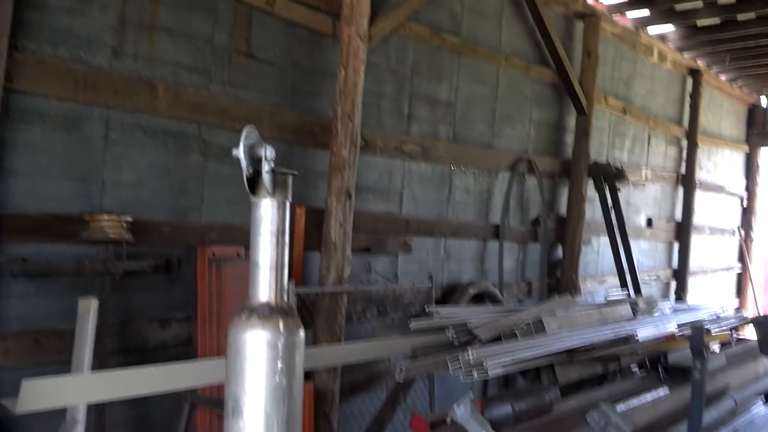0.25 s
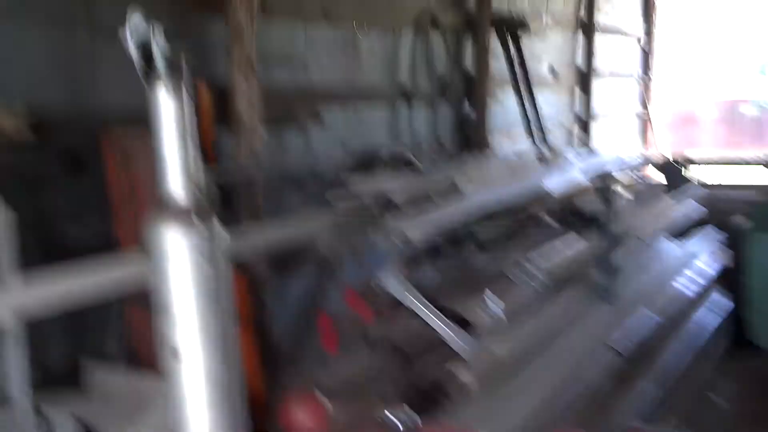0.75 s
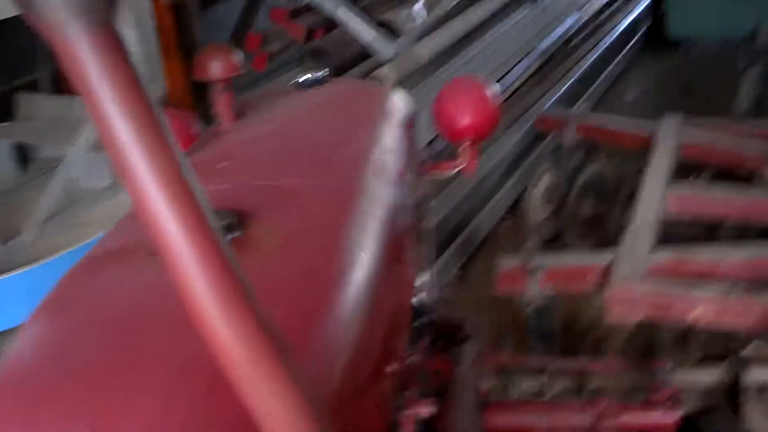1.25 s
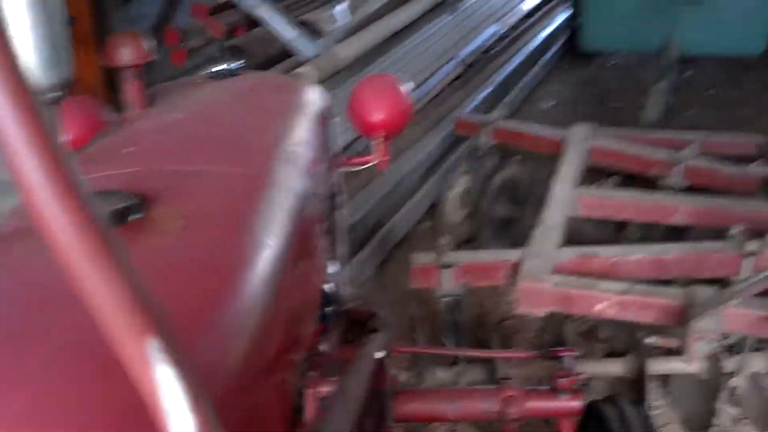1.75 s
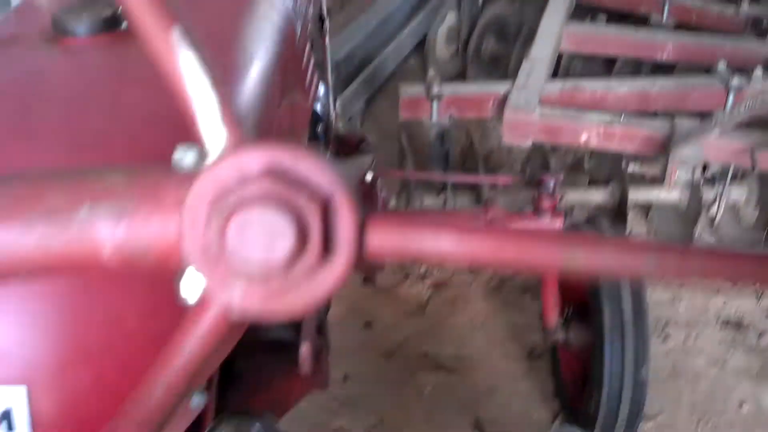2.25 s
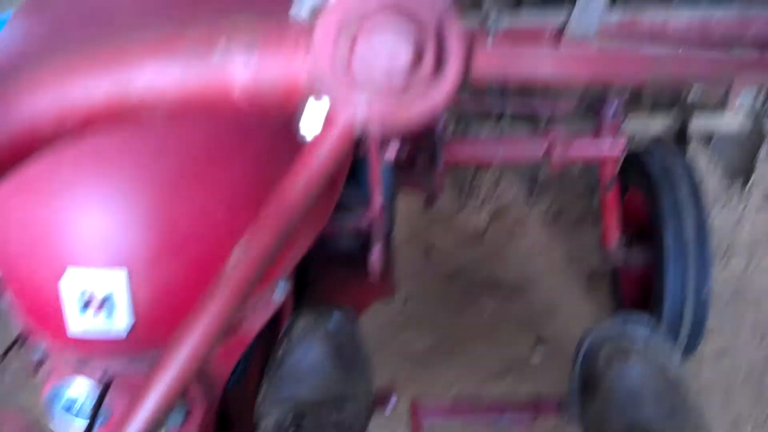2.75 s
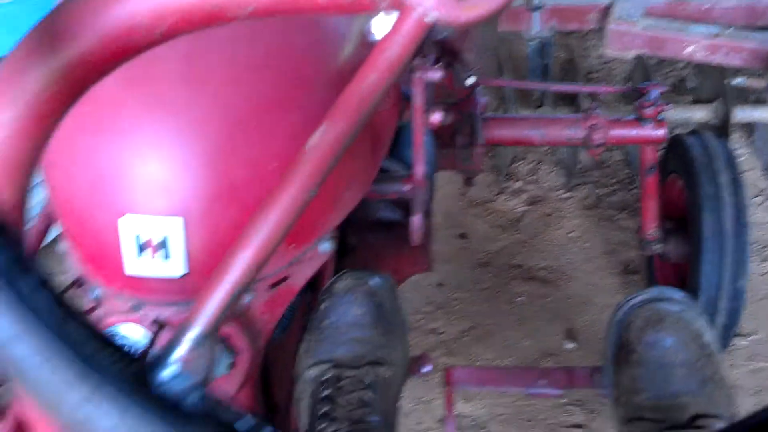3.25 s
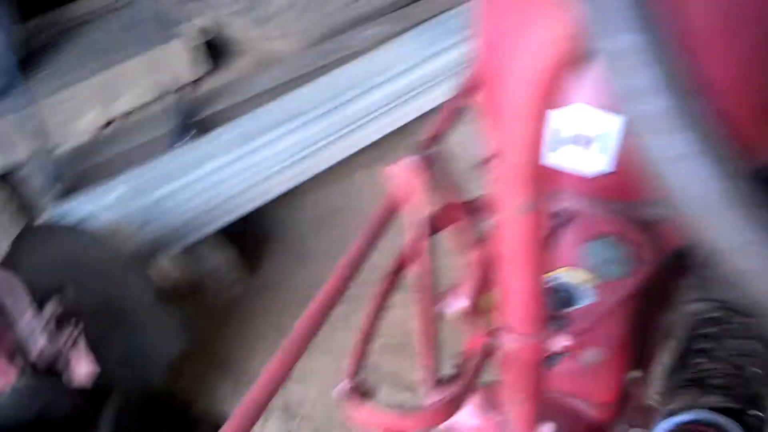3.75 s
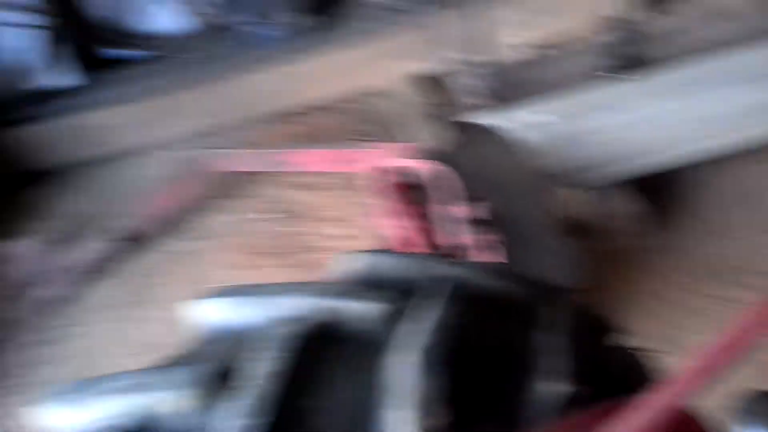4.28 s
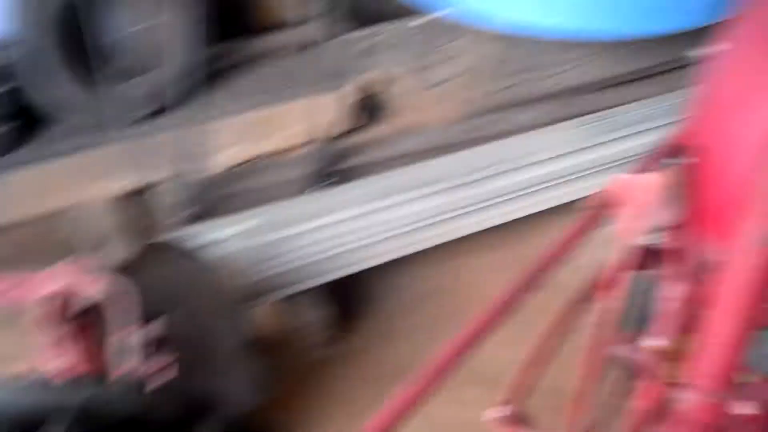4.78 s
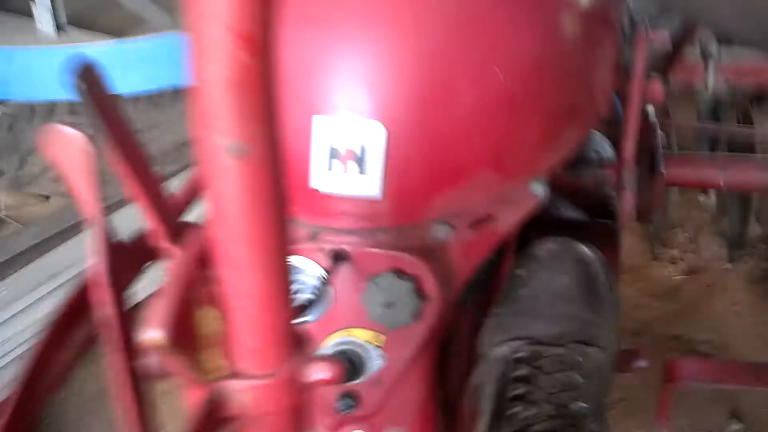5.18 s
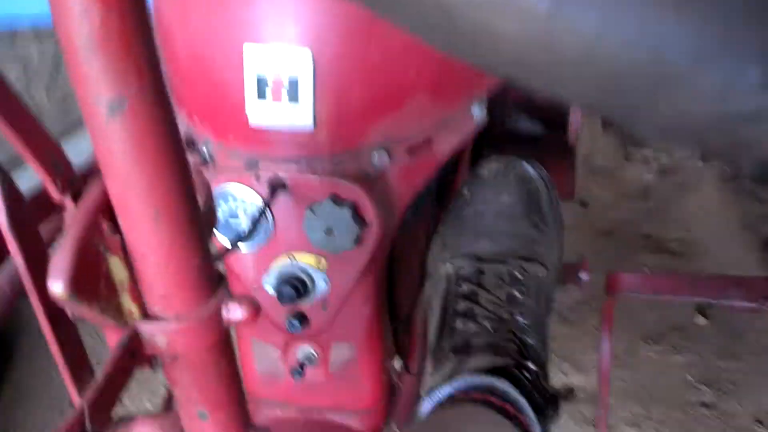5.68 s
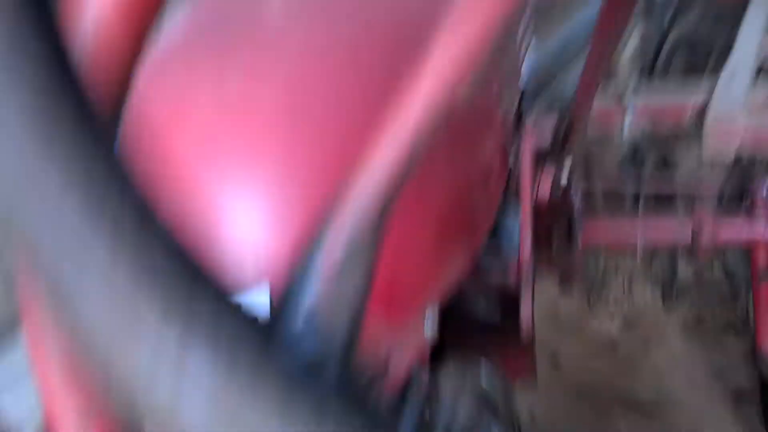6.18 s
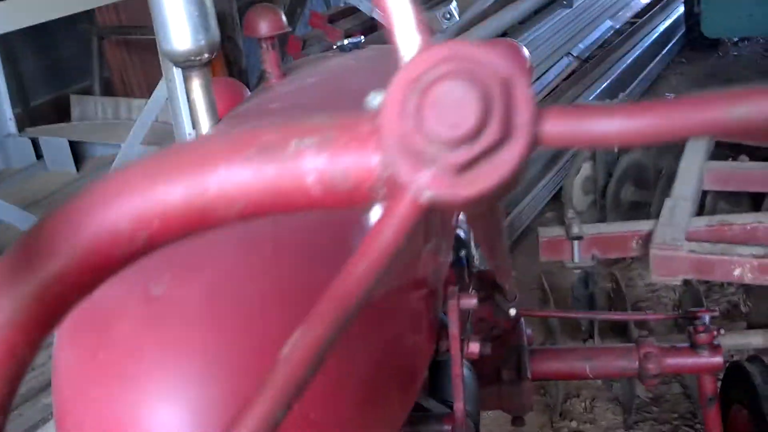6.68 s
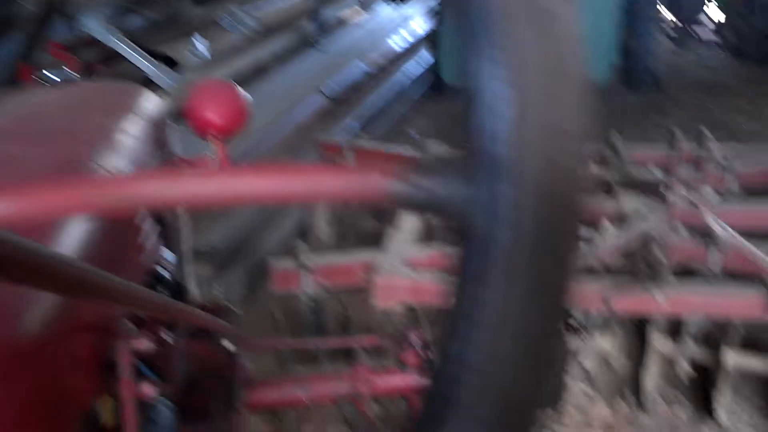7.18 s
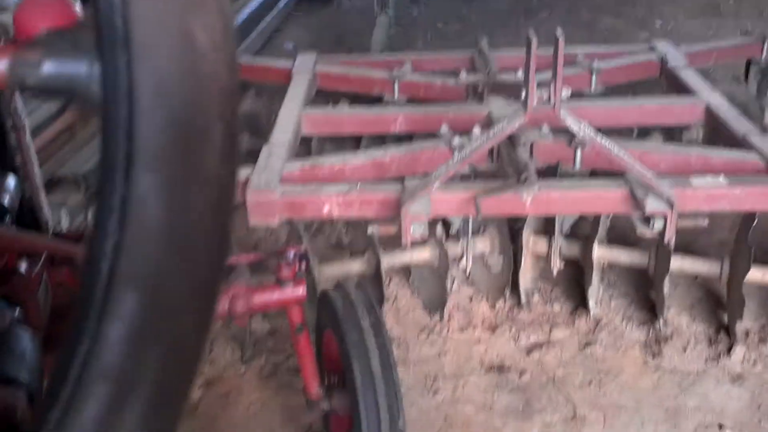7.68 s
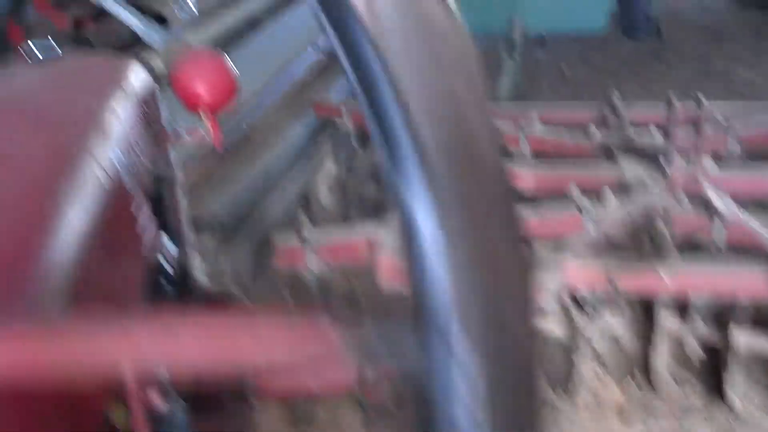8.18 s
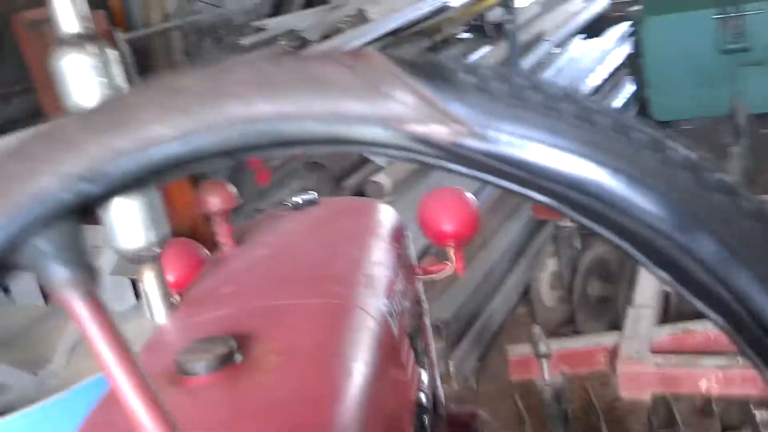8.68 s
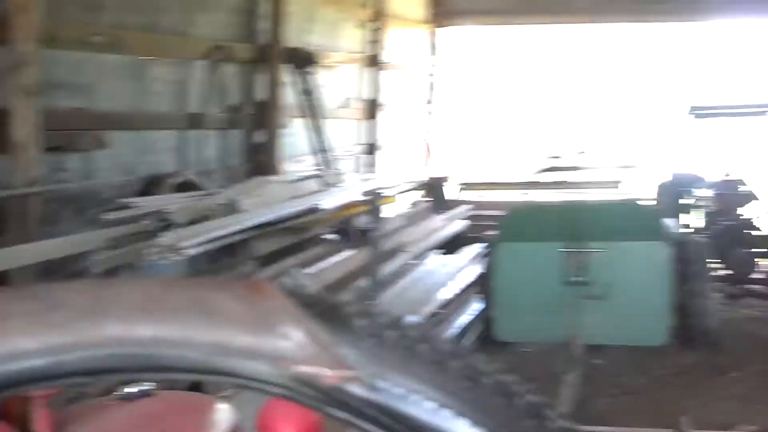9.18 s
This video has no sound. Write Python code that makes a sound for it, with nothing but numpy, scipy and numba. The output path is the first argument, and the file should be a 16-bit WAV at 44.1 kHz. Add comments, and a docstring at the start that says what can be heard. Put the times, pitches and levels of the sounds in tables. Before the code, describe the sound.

An old four-cylinder tractor engine idles steadily in a shed, clattering and throbbing, while fingers rub and knock the recording phone early on.

```python
"""In an open shed an old four-cylinder tractor idles, heard by a hand-held phone from the driver's seat.
Exhaust and engine tones tied to the crank throb; shaped noise, partly alike each cycle, makes clatter and roar.
A steady wavering tone is the fan's hum; decaying modes give the rain flap, a loose tappet and loose tin.
Fingers rub and knock the phone's case, which rings; loud knocks pull the gain control down and it creeps back."""
import sys
import numpy as np
from scipy import signal
from scipy.fft import rfft, irfft
from scipy.io import wavfile
from scipy.ndimage import uniform_filter1d
from numba import njit

SR = 44100
rng = np.random.default_rng(int(sys.argv[2]) if len(sys.argv) > 2 else 0)


def store_pcm(level_fs):
    """Save levels as 16-bit WAV."""
    pcm = np.round(np.clip(level_fs, -1, 1) * 32767).astype(np.int16)
    wavfile.write(sys.argv[1], SR, np.atleast_2d(pcm).T)


N = 416304
T = np.arange(N) / SR  # time of each sample, s
HZ = np.arange(N // 2 + 1) * SR / N + 1e-3  # frequency of each spectrum bin

# spectrum of engine clatter and gas roar, before it swells and fades: (frequency [Hz], level [dB per Hz])
ROAR_SPECTRUM = [(55, -90), (85, -66), (300, -62.5), (600, -61.5), (1100, -60), (1700, -69), (2600, -72),
                 (3200, -74), (3800, -75), (4300, -78.5), (5500, -80.5), (7500, -88), (10300, -94),
                 (11600, -85.5), (13500, -79), (15700, -80.5)]
# ringing modes of the phone case: (frequency [Hz], free fall by 60 dB [s], level [dB], left minus right [dB])
CASE_MODES = [(182, 0.089, -3.5, 5), (247, 0.32, -7, 2.5), (341.6, 0.34, -10.5, -0.5),
              (438.3, 0.18, -8.5, -18), (481, 0.17, -10, 3), (535, 0.039, -9, 10), (689, 0.12, -11, 9),
              (860, 0.2, -15, 1), (890, 0.13, -9.5, 4), (913, 0.25, -5.5, -1), (1040, 0.049, -6.5, -2.5),
              (1300, 0.057, -19, -1), (2060, 0.041, -21, -2), (3850, 0.0061, -47, -8)]
SIDE = np.array([[.5], [-.5]])  # shares a left-minus-right level between left and right


def undb(db):
    """Turn decibels into an amplitude factor."""
    return 10 ** (np.asarray(db, float) / 20)


def along(table, column=1):
    """Draw a table column along the frequency axis, straight on a log scale."""
    return np.interp(np.log(HZ), np.log([row[0] for row in table]), [row[column] for row in table])


def curves(table):
    """Draw the columns of a timed table as straight lines between its times."""
    seconds, *columns = np.transpose(table)
    return [np.interp(T, seconds, column) for column in columns]


def ring(x, hz, t60, part=np.imag):
    """Let x strike one mode, which falls by 60 dB in t60 seconds."""
    pole = np.exp(2j * np.pi * hz / SR - np.log(1000) / (t60 * SR))
    return part(signal.lfilter([1], [1, -pole], x))


def walk(rate):
    """Wander smoothly between random values, rate new ones a second, with a spread near 1."""
    k = int(SR / rate)
    steps = np.repeat(rng.standard_normal(N // k + 1), k)
    return 1.153 * uniform_filter1d(uniform_filter1d(steps, k), k)[:N]


def strikes(seconds, db):
    """Place single-sample blows at the given times."""
    x = np.zeros(N)
    x[(np.asarray(seconds) * SR).astype(int)] = undb(db)
    return x


def shed_echoes():
    """Echoes in the shed are imitated by steady low noise, different at each microphone."""
    low_pass = 1 / (1 + (HZ / 1100) ** 8)
    shape = undb(along(ROAR_SPECTRUM) - 7.0) * np.sqrt(SR / 2 * low_pass)
    return irfft(np.array([rfft(rng.standard_normal(N)) * shape for _ in range(2)]), N)


def finger_rubs():
    """A sliding finger sticks and slips; the many tiny clicks ring the case at both microphones."""
    # slides, pressing evenly harder or softer: (start [s], end [s], start level [dB], end level [dB])
    rubs = [(0, 0.48, -15.5, -18.5), (0.492, 0.58, -19, -22), (1.012, 1.05, -19.5, -34),
            (1.058, 1.097, -34, -22), (4.5, 4.785, -54, -21)]
    slips = (rng.random((2, N)) < 1500 / SR) * rng.standard_normal((2, N))  # 1500 clicks per second
    slips[1] = .9 * slips[0] + .4 * slips[1]  # the two sides hear much the same clicks
    press = sum((T >= a) * (T < b) * undb(np.interp(T, [a, b], [a_db, b_db])) for a, b, a_db, b_db in rubs)
    press = uniform_filter1d(press, int(.013 * SR))  # soft edges of 13 ms
    slips = slips / slips.std() * press * undb(1.2 * walk(30))
    # the lowest modes rock the phone, so its two ends move in opposite senses
    rock = np.array([[1], [-1]])
    out = 0
    for k, (hz, t60, db, pan_db) in enumerate(CASE_MODES):
        sign = (-1) ** k * rock ** (hz < 300)
        out = out + sign * undb(db + pan_db * SIDE) * ring(slips, hz, t60) / np.sqrt(t60 * SR / 10)
    return out


def finger_knocks():
    """A fingertip pushes briefly and lets go; the case modes near the blow's pitch ring, damped by the grip."""
    # knocks: (time [s], peak level [dB], centre of the modes struck [Hz],
    #          grip damping [ring time is divided by it], left minus right [dB])
    knocks = [(.292, -5.5, 780, 3.1, -1), (0.469, -2, 860, 9.8, -3.5), (0.507, -0.5, 670, 5.7, -0.5),
              (.5826, -8.5, 427, 2.2, -15), (0.845, -17, 1300, 4, -3), (0.857, -12, 497, 6.5, 6),
              (0.86, -11, 1100, 5.2, -2.5), (0.8852, -13, 423, 4.6, 8), (0.924, -19, 900, 8, -3),
              (1.0581, -5, 1700, 5.7, 3), (1.0586, -4, 1060, 10, -5), (1.0774, -4.5, 630, 26, 12),
              (1.0807, -25, 333, 6.9, -7), (1.092, -13, 950, 8, -5), (2.53, -18, 690, 1.7, 2),
              (4.7455, -14, 700, 8, -2), (4.7839, 10, 993, 66, -0.5)]
    # modes that lie close together share a blow
    share = np.minimum(np.gradient(np.log2([mode[0] for mode in CASE_MODES])), .2)
    out = np.zeros((2, N))
    for s, db, centre_hz, grip, pan_db in knocks:
        push = np.diff(np.hanning(int(SR / centre_hz / 1.2)) ** 2)
        start, tap = int(s * SR), np.pad(push, (0, 4000))
        # a loose grip lets a single mode sing out
        spread_oct = .45 * min(grip / 3, 1) ** 3
        knock = 0
        for part, (hz, t60, *_) in zip(share, CASE_MODES):
            near = np.exp(-.5 * (np.log2(hz / centre_hz) / spread_oct) ** 2)
            knock = knock + part * near * ring(tap, hz, min(t60, .11) / grip)
        out[:, start:start + len(tap)] += undb(db + pan_db * SIDE) * knock / abs(knock).max()
    return out


def tin():
    """A loose sheet shakes in short bright bursts of ringing grains and now and then squeaks on one tone."""
    # ringing modes of the sheet: (frequency [Hz], fall by 60 dB [s])
    modes = [(3560, .03), (3700, 0.045), (3830, .03), (3990, .03)]
    # bursts of shaking: (start [s], level [dB])
    shakes = [(.87, -49), (1.47, -50), (1.61, -48), (1.8, -45), (2.04, -43), (2.23, -45), (2.48, -44),
              (2.92, -48), (3.07, -48), (3.789, -48), (4.09, -44), (4.38, -44), (4.53, -46), (5.25, -42),
              (6.11, -47), (6.26, -46), (7.1, -44), (7.68, -42), (7.84, -45), (8.42, -47), (8.71, -49),
              (8.86, -47)]
    # squeaks: (start [s], length [s], level [dB])
    squeaks = [(2.927, .13, -45), (3.68, 0.13, -49), (6.421, .16, -48)]
    swell = signal.oaconvolve(strikes(*np.transpose(shakes)), np.hanning(int(.068 * SR)))[:N]  # 68 ms each
    grains = (rng.random(N) < 900 / SR) * rng.standard_normal(N)  # 900 per second
    shaken = sum(ring(grains, hz, t60) for hz, t60 in modes)
    loudness = sum(undb(db) * (T > a) * (T < a + length) for a, length, db in squeaks)
    loudness = uniform_filter1d(loudness, size=600) * undb(2.5 * walk(60))
    squeak = loudness * np.cos(2 * np.pi * 3860 * T + .8 * walk(80))
    return swell * shaken / shaken.std() + squeak


def flap(turns, rise_s=.0018, hold_s=.036):
    """The rain flap chatters on the stack: each mode swells, holds and fades, wavering, with weak bounces too."""
    # ringing modes of the flap: (frequency [Hz], twice the fade by 60 dB [s], level [dB])
    modes = [(3690, .15, -5), (4520, .24, -3), (5770, .16, -9), (6700, .22, -5), (7730, .18, -12)]
    # clinks: (time [s], level [dB], extra level of the upper modes [dB])
    clinks = [(0.0094, -36, -10), (0.4204, -34, -22), (0.6729, -35.5, -11), (1.03, -48, -12),
              (1.075, -37, -5), (1.83, -41, -15), (1.9545, -49, -3), (2.03, -37, 4), (2.4573, -41, -7),
              (2.6469, -43, 5), (2.69, -49, -3), (3.241, -48, -5), (3.42, -40, -15), (3.46, -44, -15),
              (3.621, -46, -12), (3.81, -51, -10), (3.965, -55, -14), (4.14, -47, -12), (4.729, -52, 8),
              (4.87, -47, -15), (4.91, -51, -15), (5.2694, -43, -15), (5.887, -38, -6), (6.4782, -39, -6),
              (6.53, -49, -10.5), (7.015, -50, -12), (7.08, -36, -8), (7.115, -41, -17), (7.28, -38, -18),
              (7.34, -40, -17), (7.46, -46, -14), (7.595, -44, -17), (8.41, -48, -13), (8.73, -50, -12),
              (9.06, -42, -10), (9.11, -48, -12), (9.3995, -41, -3)]
    s, db, upper_db = np.transpose(clinks)
    rise = np.convolve(np.hanning(int(2 * rise_s * SR)), np.ones(int(hold_s * SR)))
    # 110 bounces per second and mode on average, thickest about a third of the way through each cycle
    often = 110 / SR * (1 + .9 * np.cos(np.pi * turns - 1.9))
    out = 0
    for k, (hz, double_fade_s, mode_db) in enumerate(modes):
        upper, fade_s = k > 2, double_fade_s / 2
        weak = (rng.random(N) < often) * undb(-58.5 - 6 * upper + 2 * rng.standard_normal(N))
        blow = strikes(s, db + upper_db * upper + 1.2 * rng.standard_normal(len(s)))
        hits = signal.oaconvolve(blow, 2 * rise / rise.sum())[300:N + 300]
        bounces = uniform_filter1d(ring(weak, 0, fade_s, part=np.real), size=200)
        swell = ring(hits, 0, fade_s, part=np.real) + bounces
        tone = np.cos(2 * np.pi * hz * T + 1.3 * walk(110) + 6 * walk(8))
        out = out + undb(mode_db + 2.5 * walk(70)) * swell * tone
    return out


def tappet(turns):
    """One loose tappet ticks once a cycle and rings the rocker cover on a single dying tone."""
    # loudness of the tick: (time [s], level [dB])
    loudness = [(0, -33), (4.75, -31), (5.1, -19.5), (5.7, -18), (6.2, -18.5), (6.35, -24), (6.6, -21),
                (7.2, -21), (7.8, -30), (9.44, -31)]
    # the tick falls at 200 degrees of each 720 degree cycle
    ticks = np.diff(np.floor(turns / 2 - 200 / 720), prepend=-1) > 0
    ticks = ticks * undb(curves(loudness)[0] + .8 * rng.standard_normal(N))
    push = signal.lfilter(np.hanning(300) / 150, [1], ticks)
    swell = abs(ring(push, 1e-3, t60=.07, part=np.real))
    return swell * np.cos(2 * np.pi * 1065 * T + .5 * walk(60))


def fan_hum(turns):
    """The belt-driven fan hums at a fixed multiple of the crank's speed, wavering a little."""
    # the hum as the phone turns, before the engine's own swells: (time [s], level [dB])
    loudness = [(0, -50), (1.1, -48), (1.6, -44), (4.5, -42.5), (5.2, -43.5), (6.8, -43.5), (7.6, -42),
                (9.44, -42.5)]
    hum = np.cos(2 * np.pi * 21.6 * turns + .3 * walk(3))  # 21.6 waves per crank turn
    return np.sqrt(2) * undb(curves(loudness)[0] + 1.3 * walk(8)) * hum


def blows(cycle, table, blow_deg, between_db, scatter_db):
    """Loudness over the cycle: each blow starts sharply and dies away, a little different every time."""
    size = undb(scatter_db * rng.standard_normal((80, len(table))))
    out = undb(between_db)
    for k, (deg, db) in enumerate(table):
        since = cycle - deg / 720
        fade = np.exp(-(since % 1) * 720 / blow_deg)
        out = out + undb(db) * size[since.astype(int), k] * fade
    out = uniform_filter1d(out, size=160)
    return out / np.sqrt(np.mean(out ** 2))


def roar(turns, keep=.94, size=6400):
    """Clatter that recurs each cycle and slowly wears into new patterns, over fresh gas noise; both beat."""
    # In the next three, angles lie in the 720 degree cycle and levels are relative.
    # the four firings thump in the lower range: (crank angle [deg], level [dB])
    thumps = [(30, -15), (215, 5), (392, -2), (565, 5)]
    # blows heard in the middle range: (crank angle [deg], level [dB])
    knocking = [(55, 2), (150, -6.5), (205, -6.5), (250, -3.5), (325, -8.5), (385, -2), (450, -8.5),
                (545, -8.5), (595, -5), (685, -1)]
    # loose tin rattles in the treble: (crank angle [deg], level [dB])
    rattles = [(28, 0), (115, 0.5), (205, 0.5), (395, -7), (570, 1)]
    # share of the power that recurs from cycle to cycle: (frequency [Hz], share [0 to 1])
    repeat = [(80, 0.1), (170, 0.4), (250, 0.45), (340, 0.85), (500, 0.85), (900, 0.6), (1300, 0.3),
              (1900, 0.1), (4000, 0.15)]
    # each cycle's pattern keeps most of the one before
    pattern = rng.standard_normal((70, size))
    pattern[1:] *= np.sqrt(1 - keep ** 2)
    pattern = signal.lfilter([1], [1, -keep], pattern, axis=0).ravel()
    cycle = turns / 2 + 1
    clatter = np.interp(cycle * size, np.arange(len(pattern)), pattern)
    share = np.clip(along(repeat), 0, 1)
    gas = rfft(rng.standard_normal(N))
    mix = np.sqrt(share) * rfft(clatter / clatter.std()) + np.sqrt(1 - share) * gas
    mix = mix * undb(along(ROAR_SPECTRUM)) * np.sqrt(SR / 2)
    # the deepest rumble and the fan's high hiss run on steadily; the ranges between beat
    edges = [1 / (1 + (HZ / hz) ** 4) for hz in (170, 600, 2600, 8000)]
    beats = [blows(cycle, thumps, blow_deg=70, between_db=-2, scatter_db=1.5),
             blows(cycle, knocking, blow_deg=24, between_db=-3, scatter_db=2.2),
             blows(cycle, rattles, blow_deg=70, between_db=-1, scatter_db=3.2)]
    out = irfft(mix * (edges[0] + 1 - edges[3]), N)
    for k, beat in enumerate(beats):
        out = out + beat * irfft(mix * (edges[k + 1] - edges[k]), N)
    return out


def crank_tones(turns):
    """Exhaust and engine tones tied to the crank, at whole and half multiples of the firing rate."""
    # tones before the engine's swells: (multiple of the firing rate, level [dB])
    orders = [(2, -68), (3, -50.5), (4, -42), (5, -48), (5.5, -52), (6.5, -54), (7, -47.5), (12.5, -49.5),
              (13.5, -49.5), (14, -48.5), (15.5, -48.5), (16, -52), (16.5, -52.5), (20.5, -53)]
    # whole multiples peak together at each firing, half ones at every other
    fire = 4 * np.pi * (turns - 1 / 4)  # two firings per crank turn
    tones = sum(undb(db + 1.1 * walk(11)) * np.cos(k * fire + .054 * k * walk(5)) for k, db in orders)
    return np.sqrt(2) * tones


def aim(x):
    """The engine's body and treble rise and fall as the phone swings about."""
    # changes of level: (time [s], level of bass and middle [dB], level of the treble [dB])
    levels = [(0, 9.5, -8), (.6, 0.5, -7), (1.2, -1.5, -4.5), (1.9, 1, 1.5), (2.8, .5, -1), (3.6, 1, -1.5),
              (4.2, -1, -4), (5.2, 0.5, -6), (6, 1.5, -3), (7, 0.5, -1), (8.3, 0.5, -3), (9.44, 0.5, -2.5)]
    low, high = 1 / (1 + (HZ / 450) ** 2), 1 / (1 + (3500 / HZ) ** 2)
    top = high / (1 + (9000 / HZ) ** 4)
    spectrum = rfft(x)
    body_db, treble_db = curves(levels)
    # the treble flickers
    treble_db = treble_db + .9 * walk(11) + .6 * walk(5)
    # the highest hiss brightens slowly, by 0.7 dB per second, and flickers by itself
    hiss_db = .7 * (T - T.mean()) + .42 * walk(9) + .72 * walk(4.05)
    body = irfft(spectrum * (undb(-.35) * low + 1 - low - high), N)
    treble = irfft(spectrum * (high - top), N) + undb(hiss_db) * irfft(spectrum * top, N)
    return undb(body_db) * body + undb(treble_db) * treble


def swelling_bands(x):
    """Bands of the engine sound, narrow or fairly wide, swell or fade for a while."""
    # bands: (centre frequency [Hz], half width [Hz])
    bands = [(463, 38), (949, 9.8), (304, 105), (1060, 90), (508, 23), (775, 57), (150, 13)]
    # swells and fades: (row of the band [from 0], middle [s], half length [s], level [dB])
    swells = [(0, 2.1, 1.4, -5), (0, 4.45, 0.72, 6), (1, 3.45, 0.51, 6.5), (1, 4.5, 0.26, -12),
              (2, 0.32, 0.5, -5.5), (2, 0.9, 0.76, -5.5), (2, 3.6, 0.9, 1.5), (3, 6.5, 0.46, -3),
              (4, 4.4, 0.35, 3), (4, 5.6, 0.5, 9), (1, 5.7, .5, 4), (5, 6.8, .4, 3.5), (5, 1.3, .6, -3.5),
              (5, 4.2, 0.55, -4), (6, 6.4, 1.2, 3.5)]
    spectrum, out = rfft(x), x
    for k, (hz, half_hz) in enumerate(bands):
        db = sum(db * np.exp(-((T - s) / length) ** 2) for row, s, length, db in swells if round(row) == k)
        out = out + (undb(db) - 1) * irfft(spectrum / (1 + ((HZ - hz) / half_hz) ** 2), N)
    return out


def crank():
    """Count the crank's turns while the governor settles; it runs a little ahead or behind at random."""
    # engine speed before the random waver: (time [s], speed [turns per minute])
    speed = [(0, 829.6), (.8, 818), (2.2, 821.2), (5.7, 832.7), (9.44, 832.65)]
    return -.056 + np.cumsum(curves(speed)[0]) / 60 / SR + .0055 * walk(2)


def lean_right(engine):
    """The phone points left for a while, so the engine's lower range leans right."""
    lean_db = 2.5 * np.exp(-((T - 4.6) / .87) ** 2)  # right minus left, strongest at 4.6 s
    change = undb(-lean_db * SIDE) - 1
    return engine + change * irfft(rfft(engine) / (1 + (HZ / 900) ** 6), N)


def scene():
    """Add the engine with all its loose parts, the fingers on the case and the shed."""
    turns = crank()
    main = crank_tones(turns) + fan_hum(turns) + roar(turns)
    engine = swelling_bands(aim(main)) + tappet(turns) + flap(turns) + tin()
    # the case cannot pass a steady push
    fingers = signal.lfilter([1, -1], [1, -.985], finger_rubs() + finger_knocks())
    return lean_right(engine) + fingers + shed_echoes()


@njit
def follow(x, start, fall):
    """Follow the peak level: it jumps up at once and sinks at a steady dB rate."""
    e = np.empty(len(x))
    for i in range(len(x)):
        start = max(x[i], start * fall)
        e[i] = start
    return e


def right_port():
    """Right microphone: bass changed in level and phase, treble inverted and a few samples early."""
    # right against left in the bass: (frequency [Hz], level [dB], phase ahead [rad])
    ports = [(40, 6.5, .8), (130, 5.5, .35), (300, 6, -.6), (470, 1.3, -.7), (620, -1, -.1), (1000, 2.2, 0),
             (1378, 0, 0)]
    edge = ports[-1][0]
    treble = np.exp(2j * np.pi * (HZ - edge) * 16 / SR)  # 16 samples early
    return np.where(HZ < edge, undb(along(ports)) * np.exp(1j * along(ports, column=2)), treble)


def record(dry, top_db=-4, start_db=3, release_db=10, knee=3, overload=.61):
    """Bass cut, gain control after the peaks (release in dB per s), overload, right microphone, steep top."""
    dry = signal.sosfilt(signal.butter(4, 60, "high", fs=SR, output="sos"), dry)
    peak = follow(abs(dry).max(axis=0), float(undb(start_db)), float(undb(-release_db / SR)))
    gain = (1 + (peak / undb(top_db)) ** knee) ** (-1 / knee)
    smooth = np.exp(-1 / (.0015 * SR))  # the gain moves over 1.5 ms
    gain = signal.lfilter([1 - smooth], [1, -smooth], gain, zi=[smooth * gain[0]])[0]
    # the control looks half a millisecond ahead, so mainly the front of a knock overloads
    gain = np.pad(gain[SR // 2000:], (0, SR // 2000), mode="edge")
    even = dry * gain
    # the overload rounds the peaks without fizz
    band = signal.butter(3, [120, 5500], "band", fs=SR, output="sos")
    bend = signal.sosfilt(band, overload * np.tanh(even / overload) - even)
    left, right = even + bend
    both = np.array([left, irfft(rfft(right) * right_port(), N)])
    steep_top = signal.ellip(10, .2, 70, 15800, fs=SR, output="sos")
    return signal.sosfilt(steep_top, np.clip(both, -1, 1))


dry = scene()
out = record(dry)
store_pcm(out)
```